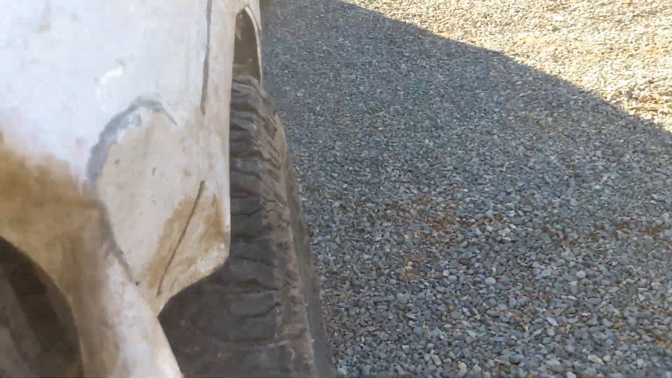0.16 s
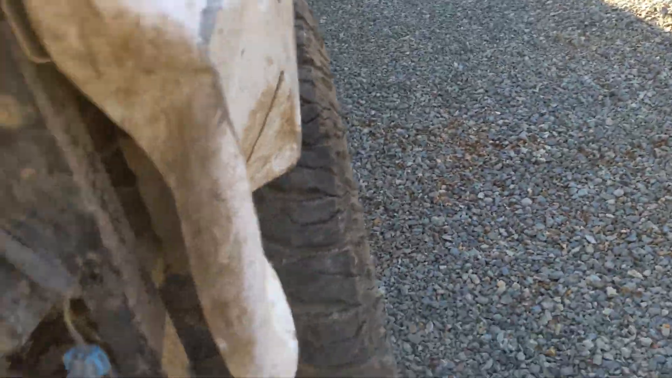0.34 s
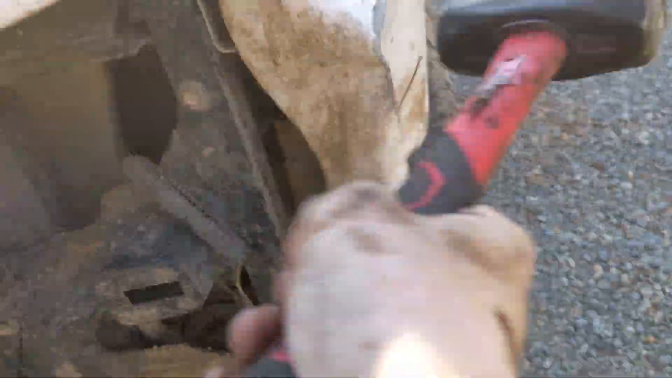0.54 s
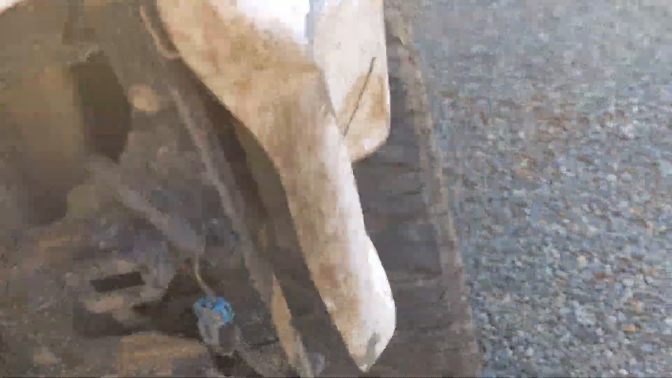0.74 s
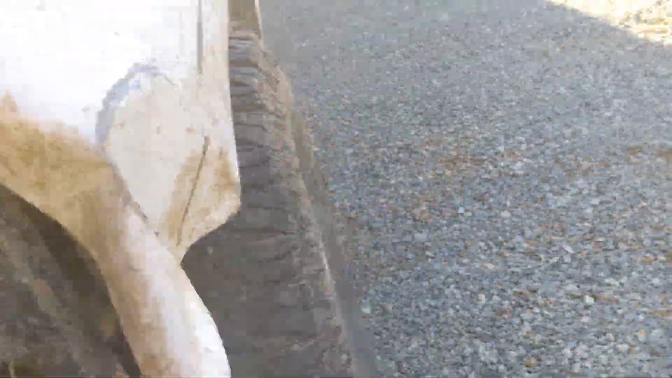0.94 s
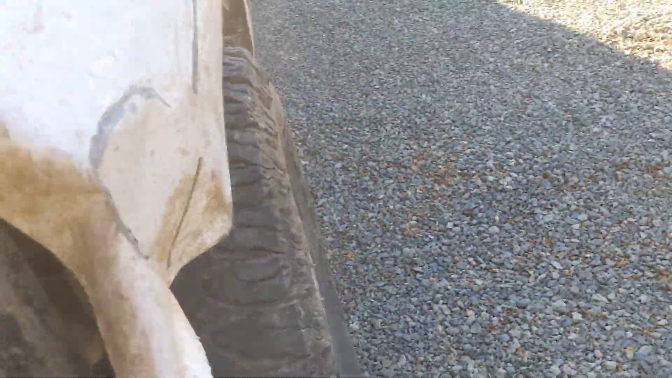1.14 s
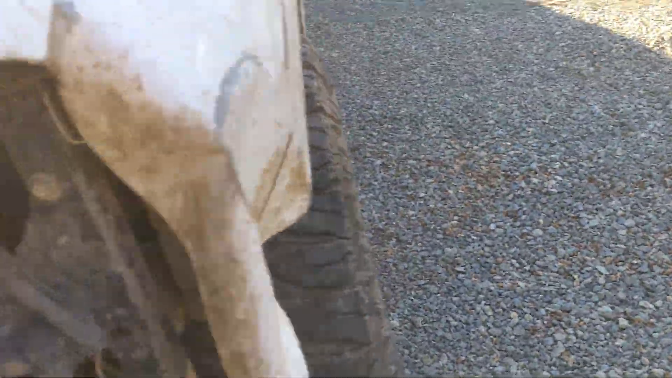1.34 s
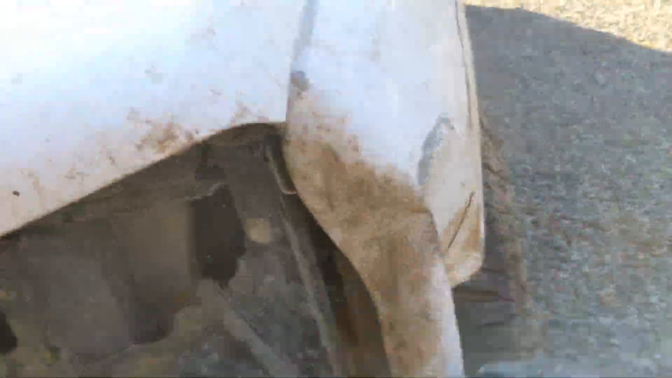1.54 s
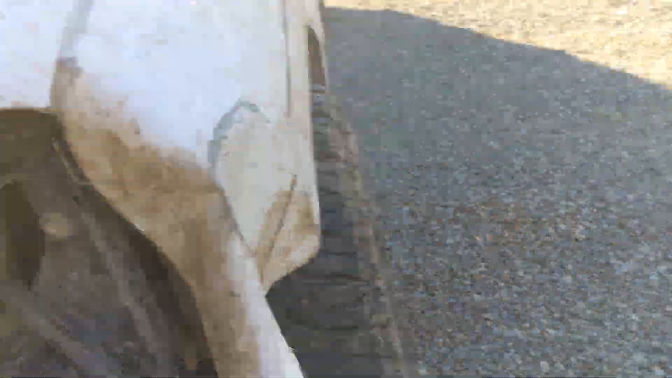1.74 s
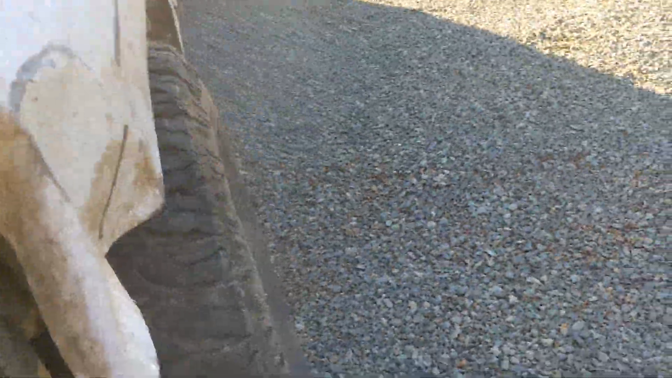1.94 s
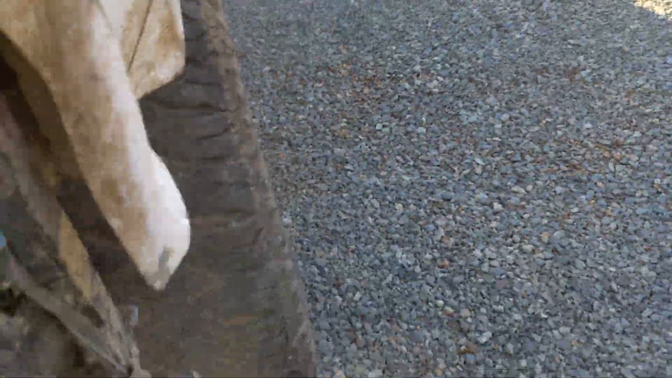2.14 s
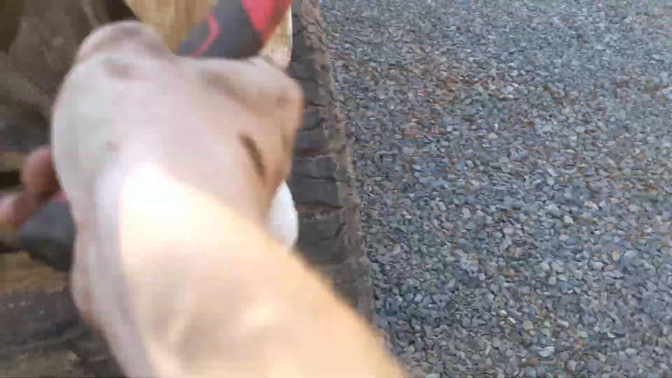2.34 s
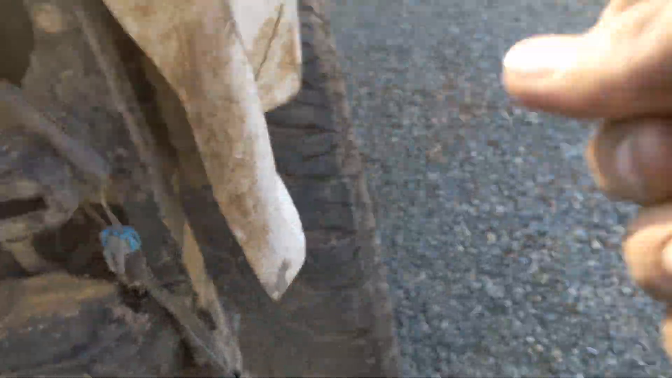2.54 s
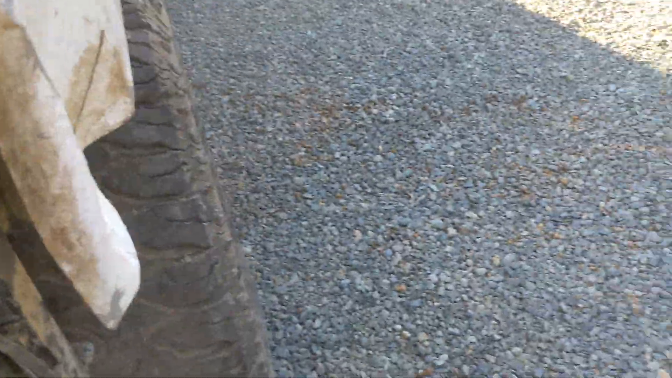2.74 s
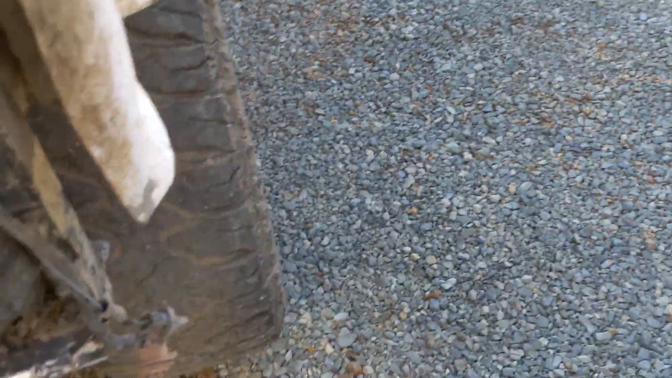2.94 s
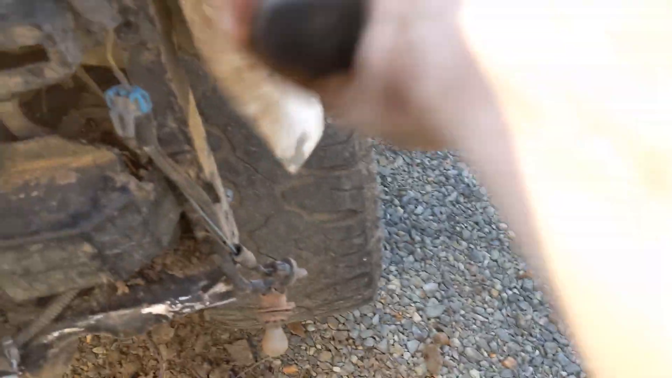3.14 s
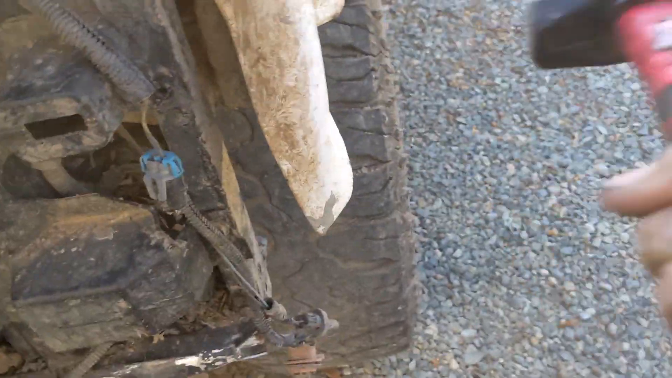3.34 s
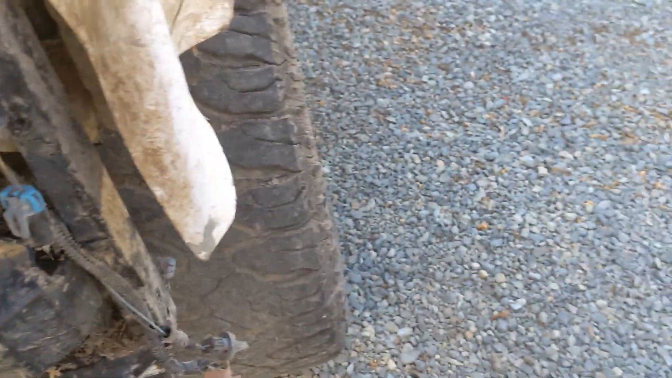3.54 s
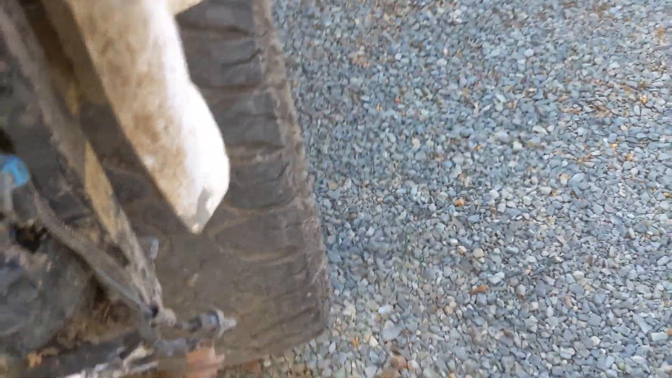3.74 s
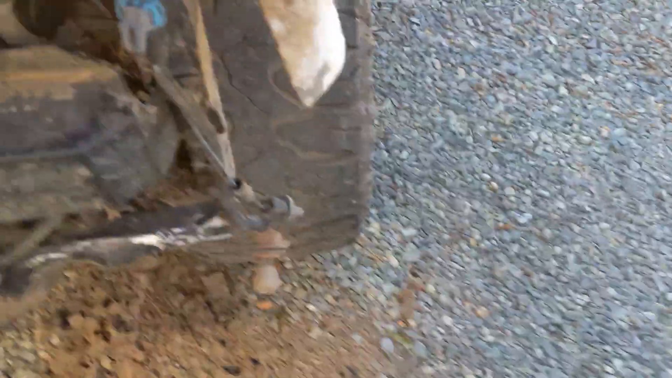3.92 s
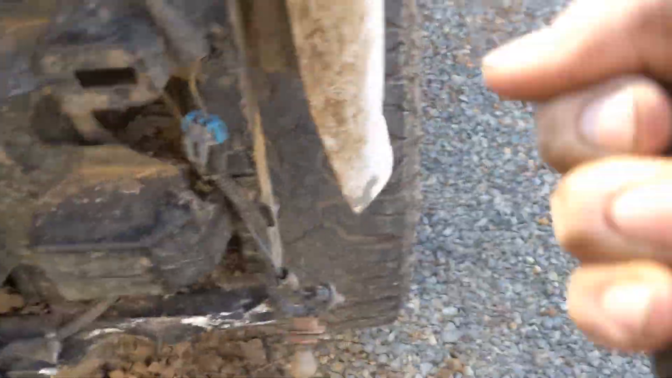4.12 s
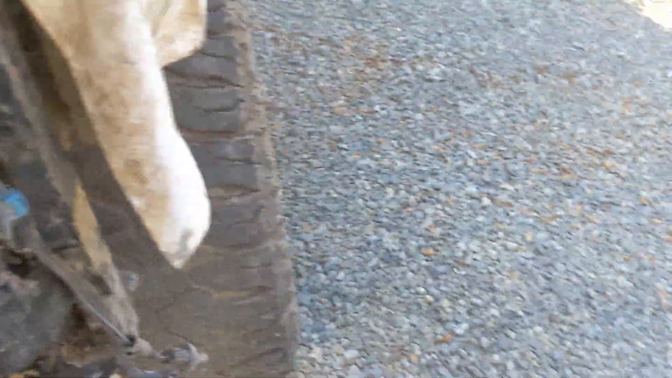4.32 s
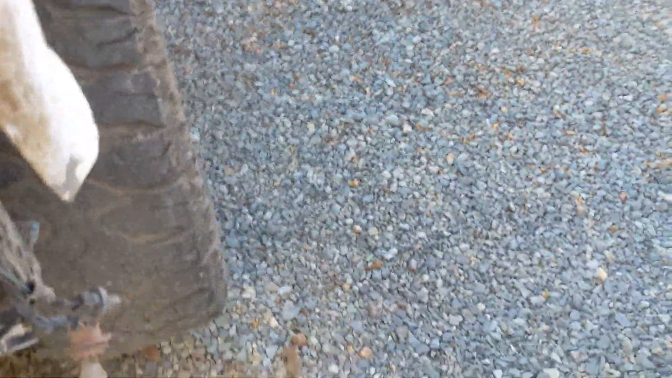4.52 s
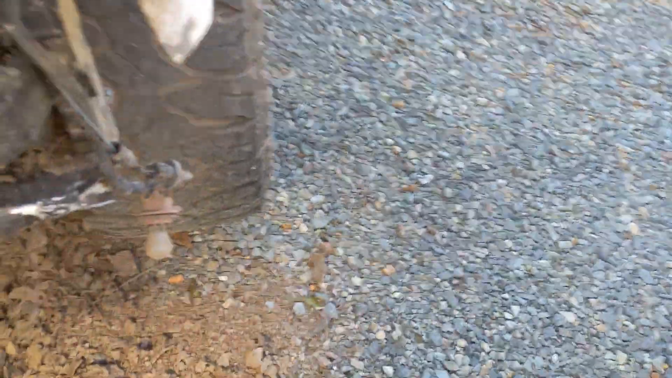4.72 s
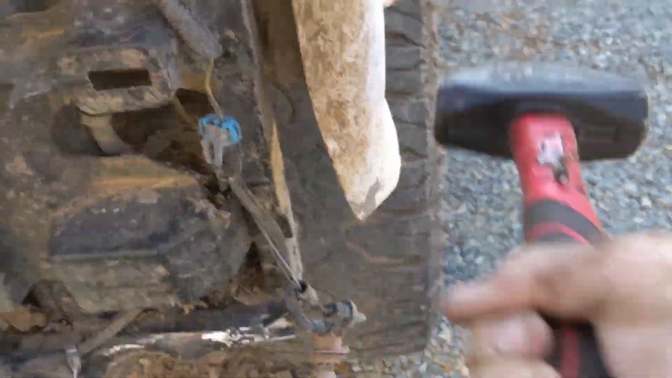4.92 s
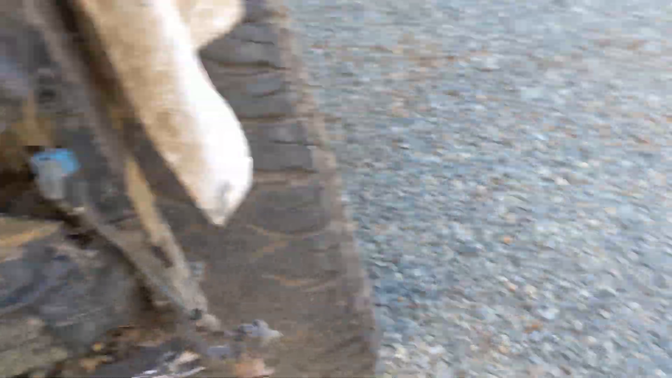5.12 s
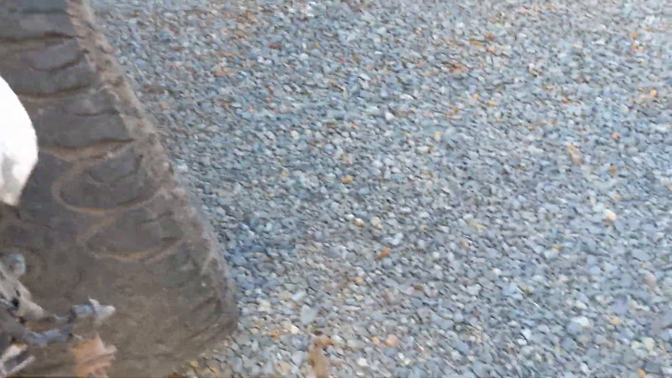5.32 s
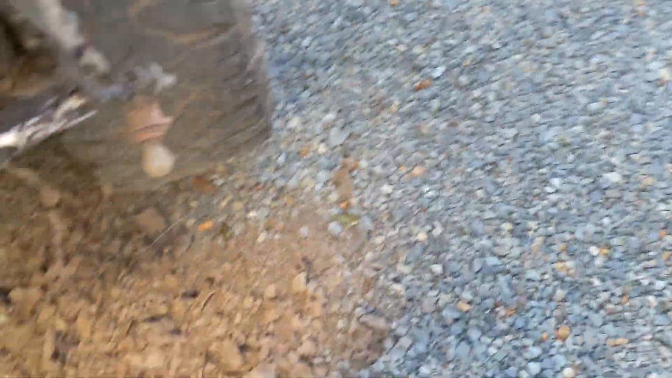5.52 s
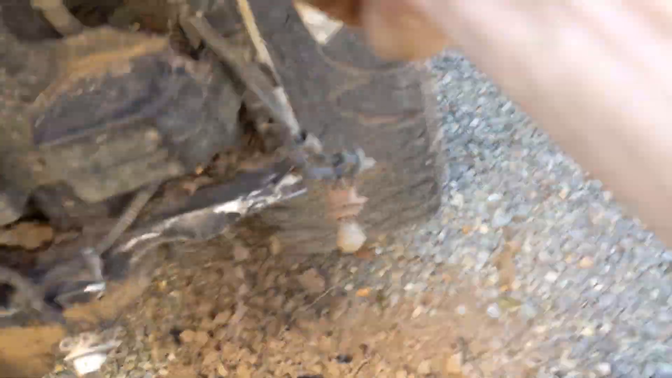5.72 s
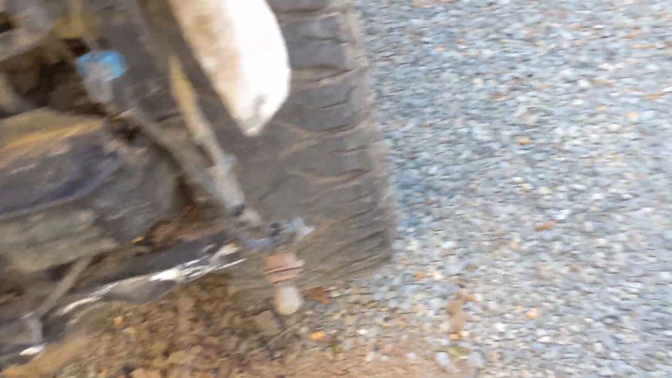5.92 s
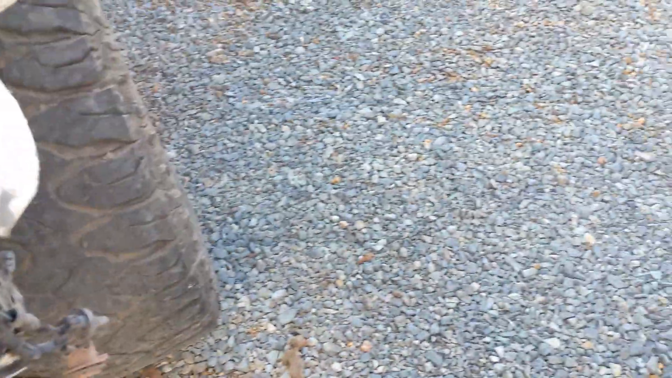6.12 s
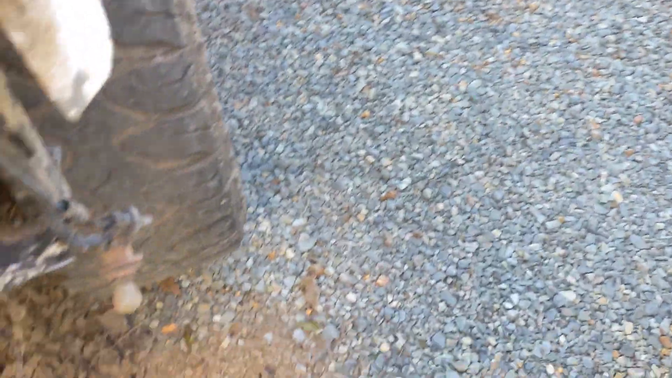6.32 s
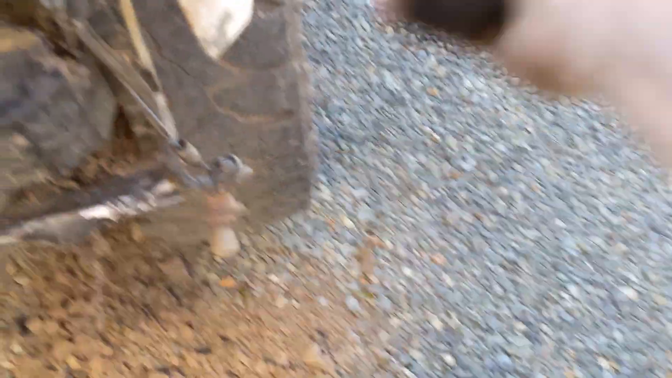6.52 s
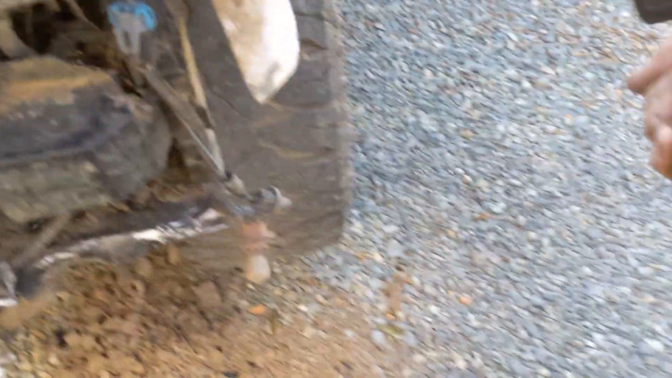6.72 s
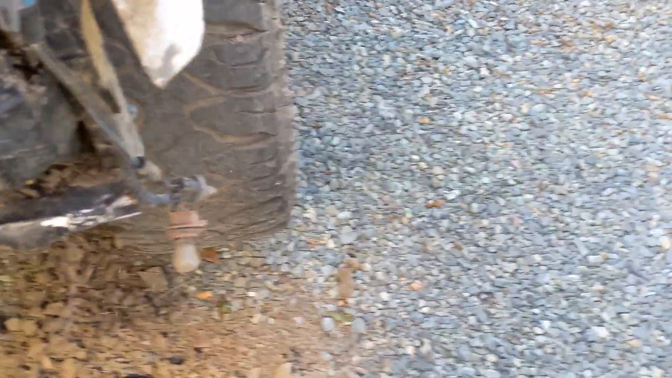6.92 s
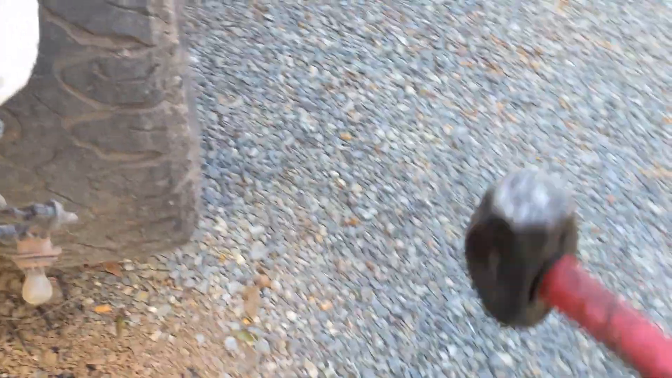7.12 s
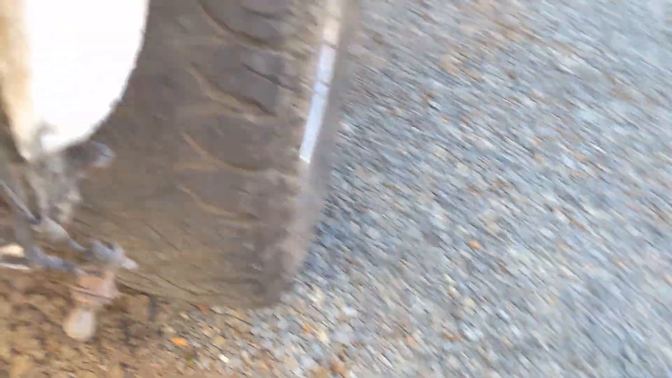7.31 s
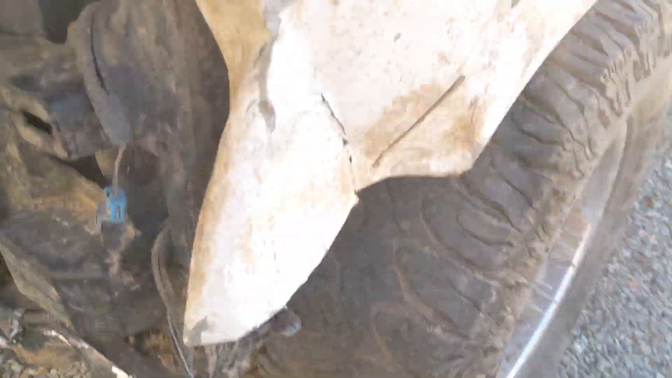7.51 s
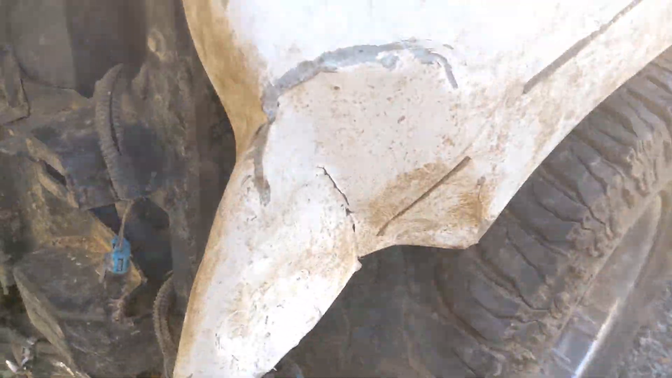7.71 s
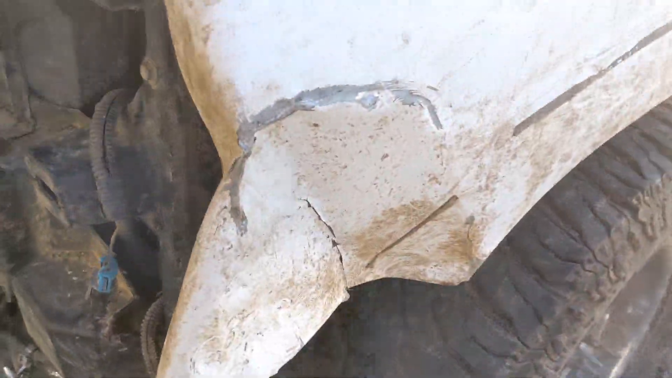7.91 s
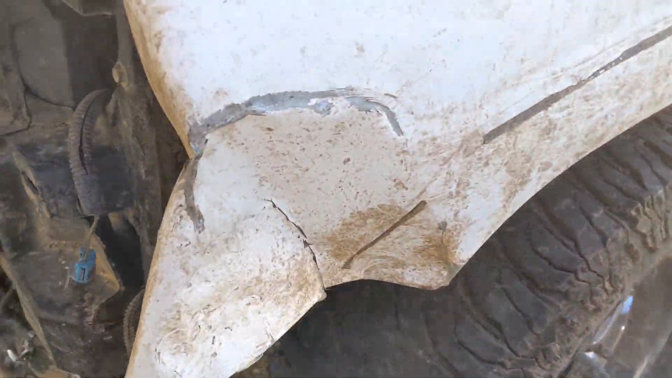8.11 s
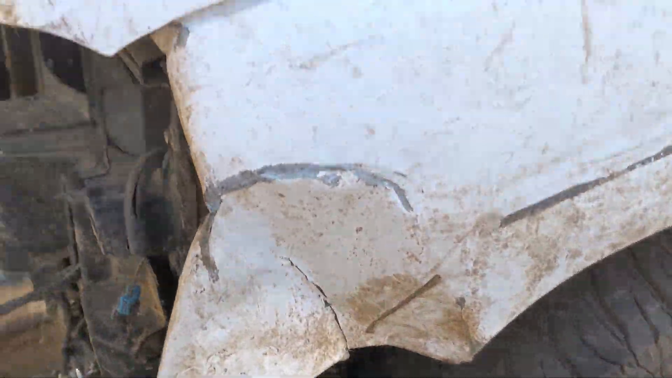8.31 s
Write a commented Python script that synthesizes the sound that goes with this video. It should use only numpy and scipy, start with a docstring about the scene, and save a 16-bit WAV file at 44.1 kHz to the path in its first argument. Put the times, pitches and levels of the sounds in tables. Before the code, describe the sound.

Outdoors, a hand-held stereo microphone is close to a steel truck fender, still ringing from an earlier hit. A hammer strikes it eight times, loud and steady, at about 0.6, 1.5, 2.4, 3.2, 4.1, 4.9, 5.8 and 6.6 seconds. Each blow is a sharp crack, with a hollow boom and clang swelling just behind it and fading within a second over a thinner, longer ring. From 3.2 seconds the hits clank more, at varying pitches; the last three ring slightly shorter. Loose parts faintly buzz and ping after each strike. Bits of grit tick down, most clearly around 3.6 seconds, and a few soft handling knocks fall between blows. From 7.2 to 7.8 seconds feet shift quietly on gravel with several light knocks and clinks, and a fainter scuff follows at 8.3. Very faint air hiss, breeze rumble and handling rustle lie underneath.

```python
"""Outdoors on gravel, a hand-held stereo microphone close to a dented sheet-steel truck fender.
The steel is already ringing as we come in. From 0.6 s a hand hammer strikes it eight times: each blow
cracks, the panel booms, loose parts buzz and ping, the chassis rings on and grit ticks down.
The limiter ducks every crack, so the boom swells up behind it. From 7.2 s feet shift on the stones,
over faint handling rustle and a light breeze."""
import sys
import numpy as np
from scipy import signal
from scipy.fft import rfft, irfft, next_fast_len
from scipy.io import wavfile
from scipy.ndimage import minimum_filter1d

SR = 44100
rng = np.random.default_rng(int(sys.argv[2]) if len(sys.argv) > 2 else 0)


def persist_wave(psi):
    """Save psi, clipped to +-1, as 16-bit WAV."""
    counts = np.round(np.clip(psi, -1, 1) * 32767).astype(np.int16)
    wavfile.write(sys.argv[1], SR, np.atleast_2d(counts).T)


N = 373076
BLOW_TIME = np.arange(65536) / SR  # time axis of one ringing blow [s]

# Levels are relative; a spectrum gives its level per hertz.
# hammer blows, the first just before the start:
# (time [s], force [dB], ring time [factor], clank pitch [Hz], clank boost [dB])
BLOWS = [(-.33, -4.5, 1, 886, 0), (0.6088, -4.5, 1.04, 920, 4.5), (1.5225, -4.5, 0.95, 2492, 2.5),
         (2.4140, -4.5, 1.07, 894, 6), (3.2411, -5.5, 1.02, 1406, 15), (4.0694, -4, 1.026, 947, 11.5),
         (4.9037, -4, 0.82, 2764, 13), (5.7886, -5.5, 0.8, 1445, 10), (6.642, -6, 0.87, 954, 7)]
# the fender's strongest modes: (frequency [Hz], level [dB], base t60 [s])
FENDER_MODES = [(39.8, -20.5, 0.32), (46, -19, 0.92), (61.7, -1.5, 0.75), (83.3, -3.5, 0.36),
                (99.6, -8.5, 0.32), (106, -19.5, 1), (132.3, -6.5, 0.74), (149.8, -2, 0.94),
                (166.2, -7, 0.92), (182.6, -1, 0.51), (195, -11, 0.5), (202.1, -8, 0.9),
                (214.8, -3.5, 0.81), (247, 1.5, 0.56), (260, -9.5, 1), (277.2, 3, 0.47), (285, -5.5, 0.88),
                (265, 5, 0.48), (308, 0.5, 0.22), (326, -12, 0.4), (335.7, 3, 0.31), (362.7, 1.5, 0.5),
                (403.5, -13.5, 1), (420.3, -1.5, 0.54), (422.5, -7.5, 0.65), (479, -11.5, 0.61),
                (521, -9, 0.94), (574, -6, 0.85), (706, -9.5, 0.53), (882, -3.5, 0.6)]
# thick chassis parts that ring on between blows: (frequency [Hz], level [dB], base t60 [s])
CHASSIS_MODES = [(86, -13, 3.5), (146, -12, 2.2), (281, -11, 2.3), (298, -14, 4), (524, -17, 1.7),
                 (555, -18, 1.6), (653, -17, 2.2), (925, -19, 1.3), (1187, -17, 1.4), (1546, -21, 1.5),
                 (1845, -23, 1.4), (2630, -19, 1.5), (2735, -23, 1.7), (2776, -23, 2), (2887, -25, 1.6),
                 (3128, -29, 2), (3174, -24, 1.3), (3866, -24, 1.2)]
# the thin, long ring of the chassis steel: (frequency [Hz], level [dB])
SHIMMER_SPECTRUM = [(1000, -30), (1200, -10), (1500, -22), (2400, -10), (2750, 0), (2950, -6), (3150, -5),
                    (3450, -22), (3870, -11), (4200, -24), (8000, -40)]
# the thicket of higher panel modes: (frequency [Hz], level [dB])
CLANG_SPECTRUM = [(25, -8.5), (90, -6), (250, 5), (450, 5.5), (700, -1.5), (950, -0.5), (1300, -4),
                  (1850, -12.5), (2600, -20.5), (3500, -21), (5200, -33), (6200, -29.5), (9000, -33.5),
                  (16000, -40.5)]
# where those modes crowd together: (frequency [Hz], width [Hz], boost [dB])
CLANG_CLUSTERS = [(950, 60, 2.5), (1140, 32, 6), (1155, 16, -6.5), (1410, 27, -4), (2350, 650, 9),
                  (4630, 360, 4), (5260, 93, -1.5), (6940, 250, 6.5), (8050, 400, 9)]
# how long they ring: (frequency [Hz], base t60 [s])
CLANG_DECAY = [(60, 1), (300, 0.67), (1000, 0.78), (2800, 0.81), (5000, 0.74), (7000, 0.34), (15000, 0.43)]
# the dent buckling under the hammer face: (frequency [Hz], level [dB])
CRACK_SPECTRUM = [(40, 0), (200, -6), (550, -4.5), (900, -0.5), (1400, -3.5), (1900, -6), (2500, -4),
                  (3600, -9), (5500, -13), (9000, -21.5), (15500, -25.5)]
# how fast that crack dies: (frequency [Hz], t60 [s])
CRACK_DECAY = [(200, 0.15), (1500, 0.16), (4000, .11), (14000, 0.11)]
# a loose edge buzzing against the panel: (frequency [Hz], level [dB])
BUZZ_SPECTRUM = [(2500, -45), (4100, -1), (4650, 3.5), (5100, 0.5), (5500, -0.5), (6100, -25), (7000, -13),
                 (9000, -22.5), (16000, -29.5)]
# the largest bits of grit landing: (time [s], level [dB])
GRIT_FALLS = [(0.1875, -50), (1.067, -46), (3.4697, -36), (3.5533, -39.5), (3.6261, -25.5), (4.794, -46),
              (4.8132, -45)]
# grit on metal and stones: (frequency [Hz], level [dB])
GRIT_SPECTRUM = [(300, -29), (1800, 2.5), (3300, 9.5), (5000, 2), (7500, -9.5), (11000, -17.5),
                 (16000, -23)]
# resonances of what it lands on: (frequency [Hz], width [Hz], boost [dB])
GRIT_RESONANCES = [(2790, 83, 9.5), (3280, 90, 4.5), (3930, 76, 9.5), (4500, 90, 6.5)]
# knocks of handling and of stones underfoot: (time [s], level [dB], thump [dB], clink [dB])
KNOCKS = [(1.152, -42, -0.5, -14), (1.423, -40, 4.5, -16), (2.365, -37, 4.5, -10), (3.824, -44, 8.5, -10),
          (7.229, -42, 0.5, -11.5), (7.359, -33, -18, 1), (7.561, -39, -2.5, -28), (7.681, -31.5, -21, -5)]
# the snap of a knock: (frequency [Hz], level [dB])
KNOCK_SPECTRUM = [(100, 2.5), (600, 6.5), (1000, 9), (1400, -2), (2200, -3.5), (5000, -20.5),
                  (15000, -26.5)]
# the ring of a knock: (frequency [Hz], level [dB], t60 [s])
CLINK_MODES = [(727, -14, .06), (1206, -2, .03), (1384, -2, 0.034)]
# soles shifting on the gravel: (time [s], length [s], level [dB])
STEPS = [(7.20, .15, -45), (7.62, .13, -42.5), (8.27, .16, -52)]
# stones clicking under a sole: (frequency [Hz], level [dB])
STEP_SPECTRUM = [(60, -30.5), (250, -1), (550, -2), (1050, -1), (2200, -10.5), (5000, -19), (15000, -59)]
# skin rubbing on the microphone's housing: (frequency [Hz], level [dB])
RUSTLE_SPECTRUM = [(500, -2), (2500, 2), (5000, 0), (7000, -8), (15000, -7.5)]
# open-air ambience: (frequency [Hz], level [dB])
AIR_SPECTRUM = [(20, -1), (45, 0), (90, 0), (200, -7), (300, -8), (450, -14), (1000, -20), (1600, -25),
                (2500, -27), (3200, -31), (5000, -35), (6300, -42), (10000, -45), (16000, -47)]
# likeness of the microphone's two channels: (frequency [Hz], correlation [-1 to 1])
MIC_CORRELATION = [(30, .8), (70, .92), (130, .96), (260, .94), (500, .78), (1000, .42), (2000, .2),
                   (4000, 0), (14000, .1)]
# lean of the stereo image: (frequency [Hz], left minus right [dB])
MIC_BALANCE = [(100, -0.5), (500, -1.1), (1000, -3.5), (2000, 3), (4000, 1), (8000, -5.5), (13000, -4.5)]


def hammer(boom_db=-15, clang_db=-7, crack_db=5, chassis_db=-27.5, buzz_db=-44, shimmer_db=-46,
           boom_rise_s=0.0041, clang_rise_s=0.021, shimmer_base_t60=1.5, modes_per_hz=.2):
    """Each blow, close up: a crack at the dent, then bending waves spread through panel and chassis."""
    out = np.zeros((2, N))
    panel_phases = rng.random((len(FENDER_MODES), 2))
    chassis_phases = rng.random((len(CHASSIS_MODES), 2))
    hz = np.fft.rfftfreq(len(BLOW_TIME), 1 / SR)
    is_mode = rng.random(len(hz)) < modes_per_hz  # a thin plate's modes are spread evenly in frequency
    for s, force_db, ring, pitch_hz, clank_db in BLOWS:
        weights = is_mode * spot_weights(hz, depth_db=2, step_hz=70)
        thicket = irfft(weights * rfft(rng.standard_normal((2, len(BLOW_TIME)))))
        clang = at_microphone(thicket, CLANG_SPECTRUM, CLANG_CLUSTERS)
        clang = gain_of(clang_db) * dying(clang, CLANG_DECAY, ring)
        boom = gain_of(boom_db) * steel_modes(fender_modes(ring), panel_phases, ring, spread_db=0.5)
        chassis = gain_of(chassis_db) * steel_modes(CHASSIS_MODES, chassis_phases, ring, spread_db=3)
        shimmer = at_microphone(thicket, SHIMMER_SPECTRUM) * fade(BLOW_TIME, shimmer_base_t60 * ring)
        chassis += gain_of(shimmer_db) * shimmer
        body = boom * rise(BLOW_TIME, boom_rise_s) + (clang + chassis) * rise(BLOW_TIME, clang_rise_s)
        add(out, s, gain_of(force_db) * body)
        add(out, s, gain_of(force_db + buzz_db) * edge_buzz())
        add(out, s, gain_of(force_db + crack_db) * dent_crack(pitch_hz, clank_db))
    return out


def dent_crack(pitch_hz, clank_db, contact_s=0.0046, clank_width_hz=130):
    """The dent buckles under the hammer face: a short burst with one clanking resonance."""
    t = BLOW_TIME[:16384]
    weights = spot_weights(np.fft.rfftfreq(len(t), 1 / SR), depth_db=3, step_hz=110)
    burst = irfft(rfft(rng.standard_normal((2, len(t)))) * weights)
    burst = at_microphone(burst, CRACK_SPECTRUM, [(pitch_hz, clank_width_hz, clank_db)])
    return dying(burst, CRACK_DECAY) * rise(t, contact_s)


def fender_modes(ring, centre_hz=254, width_octaves=0.96, db_per_ring_lost=31):
    """The fender's modes for one blow: the deader the spot, the stronger the hollow middle ones."""
    bloom_db = db_per_ring_lost * (1 - ring)
    return [(hz, db + bloom_db * np.exp(-(np.log2(hz / centre_hz) / width_octaves) ** 2), t60)
            for hz, db, t60 in FENDER_MODES]


def steel_modes(table, phases, ring, spread_db):
    """Steel rings as damped sines; each blow lands on another spot and weights them a little anew."""
    out = np.zeros((2, len(BLOW_TIME)))
    for (hz, db, t60), (phase, side) in zip(table, phases):
        level_shift, phase_shift = rng.standard_normal(2)
        swing = gain_of(db + spread_db * level_shift) * fade(BLOW_TIME, t60 * ring)
        # a phase gap between left and right sets their correlation
        apart = np.arccos(np.clip(curve_at(MIC_CORRELATION, hz), -1, 1)) / 2 * np.sign(side - .5)
        start = 2 * np.pi * phase + 0.34 * phase_shift + np.array([[apart], [-apart]])
        out += swing * np.sin(2 * np.pi * hz * BLOW_TIME + start)
    return out


def spot_weights(hz, depth_db, step_hz):
    """The spot that is hit favours some groups of modes and misses others."""
    grid = np.arange(0, SR / 2, step_hz)
    return gain_of(depth_db * np.interp(hz, grid, rng.standard_normal(len(grid))))


def edge_buzz(peak_s=0.099, flap_hz=57.6, flap_depth=0.44):
    """A loose edge starts to chatter once the panel is swinging, in step with its slow flapping."""
    t = BLOW_TIME[:32768]
    flapping = 1 + flap_depth * np.sin(2 * np.pi * (flap_hz * t + rng.random()))
    swell = (t / peak_s * np.exp(1 - t / peak_s)) ** 2
    return at_microphone(rng.standard_normal((2, len(t))), BUZZ_SPECTRUM) * flapping * swell


def bolt_pings(db=-35, fall_db_per_s=55, fall_db_per_octave=10, per_blow=5,
               pitch_range_hz=(4420, 8400), delay_range_s=(.08, .34)):
    """Loose bolts and clips ping after each blow, more weakly as the panel comes to rest."""
    out, t = np.zeros((2, N)), BLOW_TIME[:SR // 4]
    envelope = fade(t, t60=0.092) * rise(t, rise_s=0.0047)
    for s, force_db, *_ in BLOWS:
        for when, pitch, right_phase in rng.random((per_blow, 3)):
            delay = np.interp(when, (0, 1), delay_range_s)
            hz = np.interp(pitch, (0, 1), pitch_range_hz)
            fall_db = fall_db_per_s * delay + fall_db_per_octave * np.log2(hz / pitch_range_hz[0])
            tone = np.sin(2 * np.pi * (hz * t + np.array([[0], [right_phase]])))
            add(out, s + delay, gain_of(db + force_db - fall_db) * tone * envelope)
    return out


def grit(trim_db=-2, small_per_s=1.2, small_db=-53.5, spread_db=2):
    """Grit shaken off the truck ticks on metal and stones; small bits fall at random to the last blow."""
    out, until_s = np.zeros((2, N)), BLOWS[-1][0]
    draws = rng.random((round(small_per_s * until_s), 2))
    small_falls = [(until_s * when, small_db + spread_db * (2 * size - 1)) for when, size in draws]
    for s, db in GRIT_FALLS + small_falls:
        landing = tick(GRIT_SPECTRUM, t60=0.056, tail_db=-17, tail_t60=0.41, peaks=GRIT_RESONANCES)
        add(out, s, gain_of(db + trim_db) * landing)
    return out


def knocks(thump_hz=135):
    """Light knocks of handling and of stones underfoot: a snap, a short clink and a dull thump."""
    out, t = np.zeros((2, N)), BLOW_TIME[:SR // 4]
    for s, db, thump_db, clink_db in KNOCKS:
        snap = tick(KNOCK_SPECTRUM, t60=0.018, tail_db=-17.5, tail_t60=0.49)
        clink = sum(gain_of(clink_db + mode_db) * np.sin(2 * np.pi * hz * t) * fade(t, t60)
                    for hz, mode_db, t60 in CLINK_MODES)
        thump = gain_of(thump_db) * np.sin(2 * np.pi * thump_hz * t) * fade(t, t60=0.091)
        add(out, s, gain_of(db) * (snap + clink + thump))
    return out


def tick(spectrum, t60, tail_db, tail_t60, peaks=()):
    """A small impact: a sharp snap with a weaker ring behind it."""
    t = BLOW_TIME[:SR // 4]
    envelope = fade(t, t60) + gain_of(tail_db) * fade(t, tail_t60)
    return at_microphone(rng.standard_normal((2, len(t))), spectrum, peaks) * envelope


def gravel_steps(stones_per_s=2200, size_db=3):
    """Under a sole, many stones of uneven size click against each other."""
    out = np.zeros((2, N))
    for s, length, db in STEPS:
        shape = (2, round(length * SR))
        sizes = gain_of(size_db * np.minimum(rng.exponential(1, shape), 4)) * rng.choice([-1, 1], shape)
        clicks = sizes * (rng.random(shape) < stones_per_s / SR)
        add(out, s, gain_of(db) * at_microphone(clicks, STEP_SPECTRUM) * signal.windows.hann(shape[1]))
    return out


def dust(db=-72, grains_per_s=110, size_db=2, settle_s=.35, grain_s=0.0028):
    """Fine dirt shaken loose by each blow patters down and thins out."""
    t = np.arange(N) / SR
    rate = sum(grains_per_s * (t > s) * np.exp(-abs(t - s) / settle_s) for s, *_ in BLOWS)
    grains = (rng.random(N) < rate / SR) * gain_of(size_db * np.minimum(rng.exponential(1, N), 3))
    envelope = signal.lfilter([1], [1, -np.exp(-1 / (grain_s * SR))], grains)
    return gain_of(db) * evened(envelope * steady_noise(GRIT_SPECTRUM))


def handling_rustle(db=-68, settle_db_per_s=0.8, rubs_per_s=70, rub_db=6.5):
    """Skin sticks and slips on the microphone's housing in tiny rubs, fainter as the grip settles."""
    t = np.arange(N) / SR
    rub_times = np.cumsum(rng.exponential(1 / rubs_per_s, 2000))
    strengths = np.minimum(rng.exponential(1, len(rub_times)), 3.5) - 1
    level_db = db - settle_db_per_s * t + rub_db * np.interp(t, rub_times, strengths)
    return gain_of(level_db) * steady_noise(RUSTLE_SPECTRUM)


def open_air(hiss_db=-53, wind_db=-63, wind_band_hz=(15, 45)):
    """Faint open-air hiss, and a light breeze rumbling on each microphone capsule separately."""
    hiss = steady_noise(AIR_SPECTRUM)
    wind_band = signal.butter(2, wind_band_hz, "bandpass", fs=SR, output="sos")
    rumble = signal.sosfilt(wind_band, rng.standard_normal((2, N)))
    return gain_of(hiss_db) * hiss + gain_of(wind_db) * evened(rumble)


def at_microphone(drive, spectrum, peaks=()):
    """Gives two unrelated signals a spectrum, resonances and the microphone's stereo image; rms 1."""
    hz = np.fft.rfftfreq(drive.shape[1], 1 / SR)
    mid, side = rfft(drive)
    likeness = np.clip(curve_at(MIC_CORRELATION, hz), -1, 1)
    mid, side = mid * np.sqrt(1 + likeness), side * np.sqrt(1 - likeness)
    lean = gain_of(curve_at(MIC_BALANCE, hz) / 2)
    left_right = np.array([(mid + side) * lean, (mid - side) / lean])
    peaks_db = sum(boost / (1 + (2 * (hz - centre) / width) ** 2) for centre, width, boost in peaks)
    return evened(irfft(left_right * gain_of(curve_at(spectrum, hz) + peaks_db), drive.shape[1]))


def steady_noise(spectrum):
    """Stereo noise with this spectrum, as long as the scene."""
    return at_microphone(rng.standard_normal((2, next_fast_len(N))), spectrum)[:, :N]


def dying(x, decay, ring=1):
    """Lets each frequency die away with its own t60, times the ring factor."""
    hz, t, bands = signal.stft(x, SR, nperseg=256)
    bands = bands * fade(t, ring * curve_at(decay, hz)[:, None])
    return signal.istft(bands, SR, nperseg=256)[1][:, :x.shape[1]]


def fade(t, t60):
    """Exponential decay, 60 dB down at t60."""
    return np.exp(-np.log(1000) * t / t60)


def rise(t, rise_s):
    """Exponential onset from 0 towards 1."""
    return 1 - np.exp(-t / rise_s)


def gain_of(db):
    """Decibels to amplitude."""
    return 10 ** (np.asarray(db) / 20)


def evened(x):
    """Scales to rms 1."""
    return x / np.sqrt(np.mean(x ** 2) + 1e-20)


def curve_at(points, hz):
    """Joins (frequency [Hz], value) points on a log-frequency axis."""
    point_hz, value = np.transpose(points)
    return np.interp(np.log(hz + 1), np.log(point_hz + 1), value)


def add(mix, s, sound):
    """Mixes a stereo sound in at time s."""
    start = round(s * SR)
    sound = sound[:, max(-start, 0):]
    part = mix[:, max(start, 0):][:, :sound.shape[1]]
    part += sound[:, :part.shape[1]]


def scene():
    """What reaches the microphone: the close hammering and the small sounds around it."""
    return (hammer() + grit() + knocks() + dust() + handling_rustle() + gravel_steps()
            + open_air() + bolt_pings())


def record(dry, ceiling_db=-4, recovery_db_per_s=115, attack_s=0.0043, top_hz=16100):
    """The limiter ducks fast and soon recovers; what slips past is rounded off, then low-passed."""
    peak_db = 20 * np.log10(abs(dry).max(0) + 1e-9)
    over_db = np.maximum(peak_db - ceiling_db, 0)
    held_db = -minimum_filter1d(-over_db, size=64)
    recovery_db = np.arange(N) * recovery_db_per_s / SR
    wanted_duck_db = np.maximum.accumulate(held_db + recovery_db) - recovery_db
    pole = np.exp(-1 / (attack_s * SR))
    duck_db = signal.lfilter([1 - pole], [1, -pole], wanted_duck_db)
    limited = dry / gain_of(duck_db)
    rounded = limited / (1 + limited ** 6) ** (1 / 6)
    low_pass = signal.firwin(255, top_hz, window=("kaiser", 9), fs=SR)
    return signal.oaconvolve(rounded, low_pass[None], "same")


dry = scene()
out = record(dry)
persist_wave(out)
```